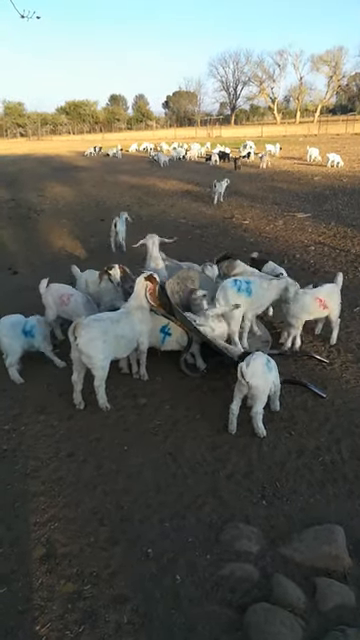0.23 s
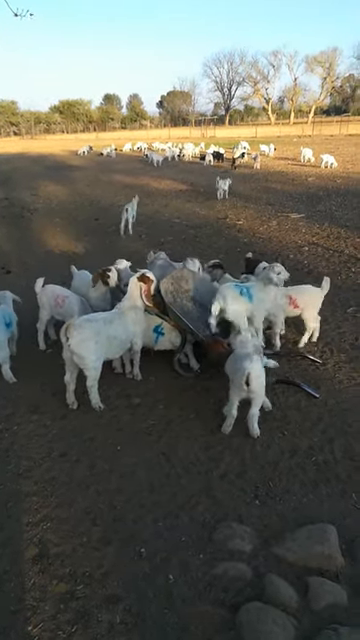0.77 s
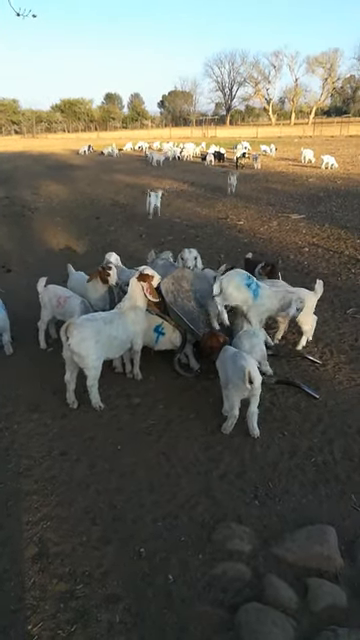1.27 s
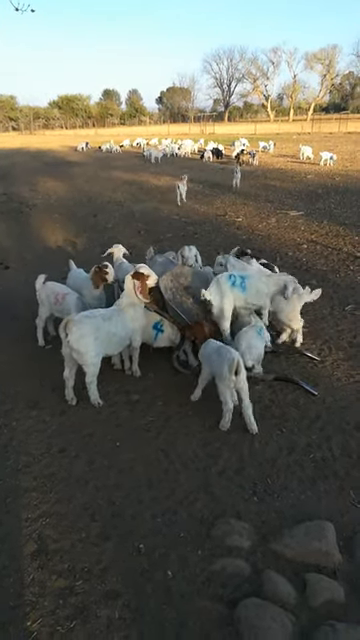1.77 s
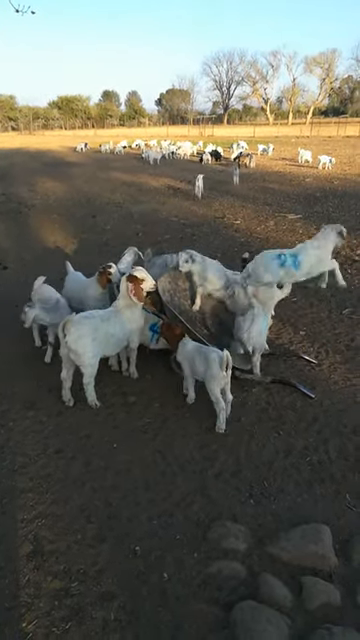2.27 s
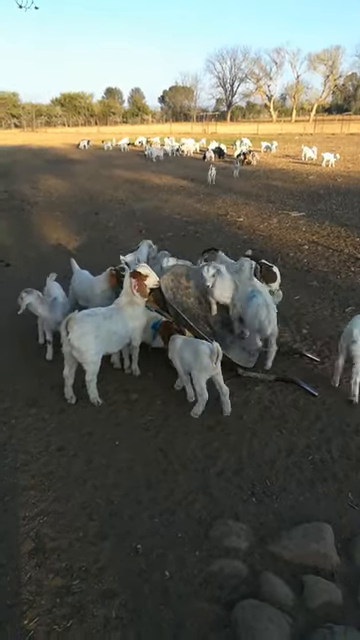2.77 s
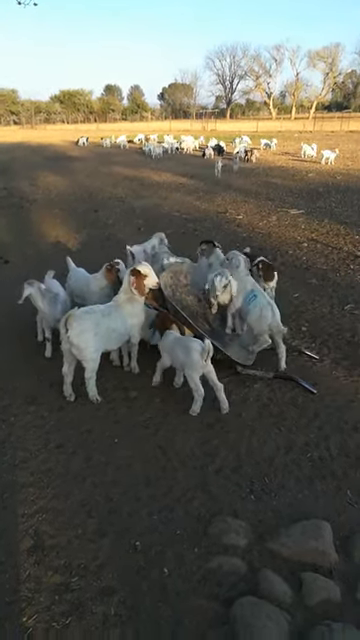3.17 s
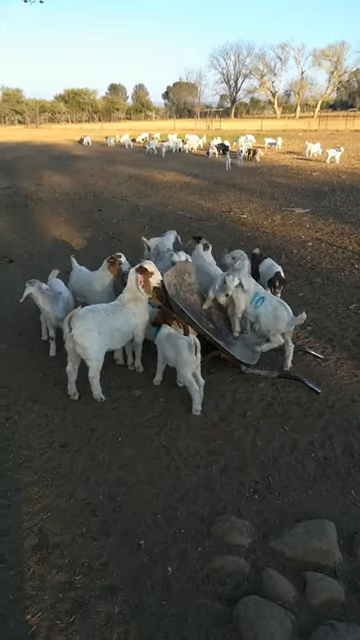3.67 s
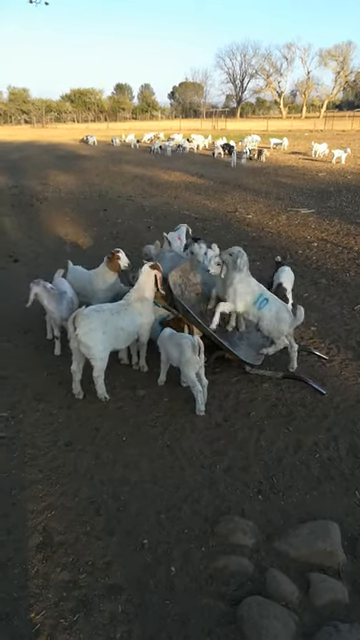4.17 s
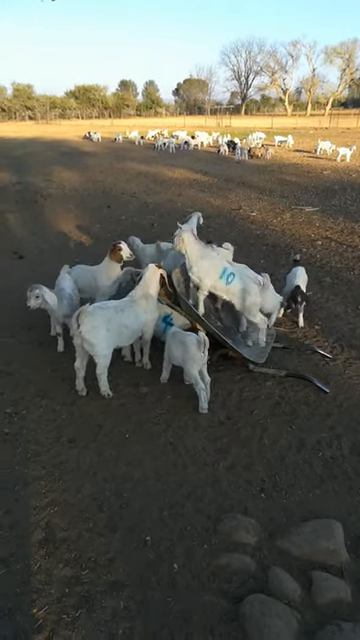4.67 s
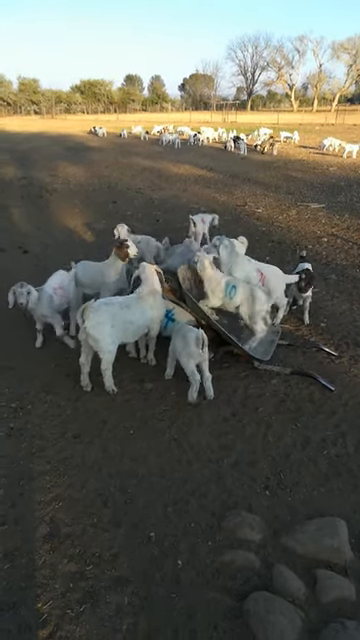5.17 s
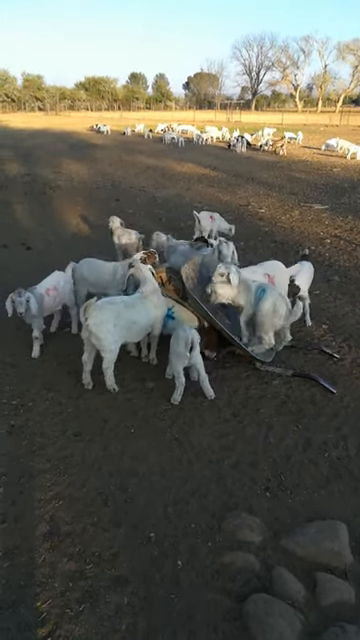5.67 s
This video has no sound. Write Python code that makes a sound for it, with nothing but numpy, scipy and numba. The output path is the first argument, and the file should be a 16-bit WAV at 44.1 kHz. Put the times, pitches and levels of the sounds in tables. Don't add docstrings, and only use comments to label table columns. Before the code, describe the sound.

Close to a hand-held phone outdoors, small goat hooves knock and clang on a steel wheelbarrow tray, with hollow booms and brief metallic ringing. Gritty scrapes fill between blows. A kid bleats faintly early, near four seconds and at the end. Wind thumps are strongest at the start; the hardest clatter comes just before five seconds.

```python
import sys
import numpy as np
from scipy import signal
from scipy.fft import rfft, irfft, next_fast_len
from scipy.io import wavfile
from scipy.ndimage import uniform_filter1d
from numba import njit

SR = 44100
rng = np.random.default_rng(int(sys.argv[2]) if len(sys.argv) > 2 else 0)


def gain_from_db(level_db):
    decades = np.asarray(level_db, float) / 20
    return 10 ** decades


def persist_wave(psi):
    counts = np.round(np.clip(psi, -1, 1) * 32767).astype(np.int16)
    wavfile.write(sys.argv[1], SR, np.atleast_2d(counts).T)


N = 261072

# f/Hz, width/Hz, level/dB
TRAY_MODES = [(739.6, 120, -2), (1280, 31, -1), (1595, 130, 0), (2082, 110, -6), (2280, 24, -6),
              (3660, 95, -4), (3750, 26, -5)]
# f/Hz, level/dB
LEFT_PATH = [(100, -3), (300, 3.5), (490, -12.5), (620, -4.5), (1500, -5), (2000, -10.5), (2300, -6.5),
             (2650, -12.5), (3250, -9.5), (4400, -15.5), (5400, -9), (6600, -11.5), (9500, -33.5),
             (16000, -37.5)]
RIGHT_PATH = [(100, -2.5), (380, 4), (510, -10.5), (680, -7), (1100, -8), (1600, -1.5), (2700, -10),
              (3600, -3), (4400, -13), (5000, -8), (5600, -14), (7100, -20), (8100, -24), (10000, -36.5),
              (16000, -35.5)]
# t/s, peak level/dB, f/Hz
EDDIES = [(0.276, -36, 116), (0.407, -29, 104), (0.643, -21.5, 75), (0.025, -23, 96), (0.809, -23, 75),
          (1.036, -28, 64.6), (1.121, -28, 64.6), (1.258, -47, 51.1), (1.4, -38, 70), (1.424, -49, 94.2),
          (1.531, -40, 88), (1.707, -46, 51.1), (1.707, -31, 53.4), (1.872, -37, 70.0), (2.107, -40, 51.1),
          (2.344, -36, 137), (2.491, -32, 50.6), (2.66, -24, 89.5), (3.178, -33.5, 129), (3.5, -38, 56.5),
          (4.142, -49, 159), (4.146, -37, 75), (4.317, -44, 153), (4.393, -36, 143), (4.52, -36, 55),
          (2.19, -30, 85), (3.95, -45, 60), (4.03, -40, 45), (4.95, -32, 88), (5.04, -36, 85),
          (2.59, -35, 45), (.33, -34, 40), (.085, -26, 140), (4.19, -37, 40), (4.73, -45, 121),
          (4.885, -45, 159), (4.887, -36, 159), (5.15, -36, 151), (5.72, -45, 45), (5.327, -39, 67.3)]


def on_log(table, hz):
    f, v = np.transpose(table)
    return np.interp(np.log(np.maximum(hz, 1)), np.log(f), v)


def unit(x):
    return x / np.sqrt(np.mean(x ** 2))


def band(x, lo_hz, hi_hz, order=3):
    return signal.sosfilt(signal.butter(order, [lo_hz, hi_hz], "band", fs=SR, output="sos"), x)


def stereo_noise():
    return rng.standard_normal((2, N))


def walk(rate_hz):
    hold = int(SR / rate_hz)
    steps = np.repeat(rng.standard_normal(N // hold + 1), hold)
    return 1.45 * uniform_filter1d(uniform_filter1d(steps, hold), hold)[:N]


@njit
def ring(start, length, pole, push, turn, n):
    out = np.zeros((2, n))
    for m in range(len(start)):
        z = push[m]
        for i in range(start[m], min(start[m] + length[m], n)):
            out[0, i] += z.imag
            out[1, i] += (z * turn[m]).imag
            z *= pole[m]
    return out


def strike(s, hz, db, t60):
    s, hz, db, t60 = (np.ravel(a) for a in np.broadcast_arrays(s, hz, db, t60))
    pole = np.exp(2j * np.pi * hz / SR - np.log(1000) / (t60 * SR))
    turn = np.exp(2j * np.pi * rng.random(len(s)))
    start = (s * SR).astype(np.int64)
    length = (t60 * SR / 2).astype(np.int64)
    return ring(start, length, pole, gain_from_db(db) + 0j, turn, N)


def bright_share(hz):
    return np.interp(np.log(hz), np.log([2400, 3200]), [0, 1])


def hooves():
    # t/s, clang peak level/dB, boom level/dB, boom centre f/Hz, bright level/dB
    stomps = [(.474, -64, -36.5, 233, -69), (.726, -17.5, -38, 374, -27.5), (.789, -36.5, -38, 248.5, -45),
              (1.411, -30.5, -34, 245.6, -46.5), (1.477, -31.5, -36.5, 317, -46.5),
              (1.699, -29.5, -30, 204.5, -46.5), (1.904, -38, -37.5, 254, -48),
              (2.048, -26.5, -36, 350, -37), (2.242, -37, -32.5, 240.4, -40),
              (2.334, -35.5, -34.5, 247, -46.5), (2.939, -27, -31, 291, -43.5),
              (3.176, -37, -31.5, 204, -55), (3.473, -40.5, -36, 260.7, -62),
              (3.638, -31.5, -40, 336, -36.5), (4.096, -29, -35.5, 274, -40.5),
              (4.45, -29.5, -34, 240, -55), (4.567, -25, -33.5, 309, -36), (4.685, -31, -35.5, 350, -44.5),
              (4.845, -17.5, -48, 288, -36), (4.892, -20.5, -27.5, 250, -26.5),
              (4.985, -31.5, -29.5, 337, -52), (5.022, -22, -33.5, 346, -34), (5.558, -37, -32.5, 260, -46),
              (5.887, -49, -42, 378, -57)]
    # t/s, clang peak level/dB, bright level/dB, clang t60/s
    knocks = [(.084, -29, -46.5, 0.23), (.17, -27.5, -42.5, .35), (.236, -35, -47, .34),
              (.503, -42, -51.5, 0.34), (.917, -52, -53.5, .18), (.952, -51, -63, 0.22),
              (1.13, -40, -49, .15), (1.174, -22, -35, .18), (1.368, -46, -65, 0.27),
              (1.503, -28.5, -38, 0.21), (1.826, -58, -57, 0.06), (2.088, -26, -41.5, 0.19),
              (2.119, -36.5, -39.5, .26), (2.539, -45, -52, .2), (2.609, -38.5, -48, 0.5),
              (2.693, -35.5, -45, .29), (3.207, -27.5, -39.5, 0.18), (3.397, -47, -52, .11),
              (4.171, -29.5, -47, 0.083), (4.213, -48, -40.5, 0.12), (4.253, -47, -52, .2),
              (4.392, -32.5, -43, 0.24), (4.511, -28.5, -37, .17), (4.814, -37, -49.5, .16),
              (5.11, -28.5, -28, .13), (5.418, -46, -54, .6)]
    stomp_t60_s, knock_boom_db, knock_boom_hz = .22, -22.5, 260
    rows = [(*row, stomp_t60_s) for row in stomps]
    for s, db, bright_db, t60 in knocks:
        rows.append((s, db, db + knock_boom_db, knock_boom_hz, bright_db, t60))
    return np.array(rows)


def clang(count=120):
    s, mid_db, _, _, bright_db, t60 = hooves().T[:, :, None]
    chance = rng.random((len(s), 4, count))
    hz = 500 + 5500 * chance[:, 0] ** 1.5
    clear = len(TRAY_MODES)
    hz[:, :clear] = np.array(TRAY_MODES)[:, 0] * (1 + 0.018 * (chance[:, 0, :clear] - .5))
    bright = bright_share(hz)
    db = (1 - bright) * (mid_db - 17) + bright * (bright_db - 9.5)
    db = db + 10 * np.log10(-np.log(chance[:, 1]))
    spread_s = -.005 * np.log(chance[:, 2])
    ring_s = np.clip(t60 * (hz / 1500) ** -.3 * (.5 + .5 * chance[:, 3]), .01, .6)
    return strike(s + spread_s, hz, db, ring_s)


def pings(pair=0.013, under_db=-8.5):
    # t/s, peak level/dB, f/Hz, t60/s
    panel_tones = [(0.083, -32, 799, 0.18), (0.169, -33, 853, 0.2), (0.235, -33.5, 1070, 0.18),
                   (0.724, -25, 730, 0.2), (1.174, -26, 581, 0.2), (1.412, -35.5, 698, 0.17),
                   (1.475, -41, 834, 0.2), (1.698, -42, 1110, 0.2), (2.047, -32, 732, 0.2),
                   (2.09, -32, 746, 0.2), (2.333, -41, 1100, 0.2), (2.938, -37, 703, 0.15),
                   (3.208, -39, 1140, 0.23), (3.473, -43, 748, 0.19), (3.636, -41, 740, 0.1),
                   (4.095, -37, 969, 0.2), (4.171, -36.5, 846, 0.2), (4.45, -31, 1128, 0.2),
                   (4.567, -32, 1080, 0.2), (4.685, -36, 884, 0.2), (4.844, -25, 695, 0.2),
                   (4.891, -26.5, 813, 0.2), (4.986, -32.5, 847, 0.2), (5.022, -27, 699, 0.2),
                   (5.113, -40, 834, 0.2), (5.479, -44, 896, 0.2), (5.557, -43, 886, 0.2),
                   (0.0, -31, 1340, 0.12), (0.0842, -34, 1445, 0.11), (0.17, -30, 1597, 0.12),
                 (0.5024, -44, 1860, 0.12), (0.6044, -37, 1420, 0.12), (0.726, -20.5, 1590, 0.12),
                 (0.7882, -34, 1580, 0.12), (1.1308, -44, 1820, 0.06), (1.1752, -26, 1605, 0.12),
                 (1.4108, -36, 1590, 0.12), (1.477, -34, 1254, 0.11), (1.5035, -32, 1470, 0.12),
                 (1.6986, -32, 1590, 0.12), (1.9034, -41, 1260, 0.12), (1.953, -36, 1485, 0.12),
                 (2.048, -27, 1293, 0.12), (2.088, -25, 1277, 0.12), (2.1396, -32, 1270, 0.13),
                 (2.2418, -35, 1280, 0.12), (2.333, -34, 1570, 0.12), (2.9393, -33, 1312, 0.12),
                 (3.2071, -35, 1500, 0.12), (3.6385, -29.5, 1340, 0.11), (3.693, -37, 1293, 0.14),
                 (4.0956, -32.5, 1470, 0.12), (4.1712, -29, 1600, 0.12), (4.3191, -39, 1550, 0.12),
                 (4.3919, -34, 1434, 0.12), (4.5111, -33, 1268, 0.12), (4.568, -28.5, 1500, 0.14),
                 (4.6967, -31, 1510, 0.12), (4.8454, -20, 1500, 0.12), (4.8914, -28, 1640, 0.12),
                 (5.0214, -26, 2080, 0.12), (5.1105, -26, 1770, 0.12), (5.461, -37, 1290, 0.12),
                   (0.7277, -29, 1750, 0.14), (1.1752, -30, 2250, 0.14), (1.5034, -34, 1860, 0.14),
                   (1.9555, -46, 1860, 0.14), (2.0467, -35, 2220, 0.14), (3.2066, -32, 1820, 0.14),
                   (3.6386, -32, 1840, 0.14), (4.0964, -36, 2110, 0.14), (4.3914, -38, 2250, 0.14),
                   (4.5106, -35, 2140, 0.14), (4.568, -33, 1940, 0.14), (4.8444, -25, 1790, 0.17),
                   (4.8914, -28, 2150, 0.14),
                   (0.7238, -23.5, 4050, 0.08), (0.7884, -32.5, 3580, 0.073), (0.9168, -48, 3260, 0.09),
                  (1.1308, -44, 3600, 0.08), (1.1742, -28, 3700, 0.07), (1.504, -30.5, 3060, 0.076),
                  (1.698, -41, 3130, 0.087), (2.0472, -33, 3150, 0.08), (2.1201, -32.5, 3340, 0.08),
                  (2.9387, -37, 3770, 0.08), (3.2066, -30.5, 3690, 0.08), (3.3964, -50, 3600, 0.08),
                  (3.6361, -27, 3610, 0.08), (4.0971, -35, 3220, 0.092), (4.1704, -38, 3690, 0.08),
                  (4.2153, -36, 3620, 0.09), (4.2787, -38, 3680, 0.08), (4.5106, -29, 3570, 0.087),
                  (4.568, -29, 3150, 0.08), (4.8439, -29, 3430, 0.08), (4.8914, -22.5, 3730, 0.088),
                  (5.0195, -27.5, 3690, 0.099), (5.1103, -24, 3850, 0.08)]
    # f/Hz, level against the clang/dB, t60/s
    frame_modes = [(580, -19.5, 0.68), (660, -29, .45)]
    s, db, hz, t60 = np.array(panel_tones).T[:, :, None]
    db = db + under_db - (on_log(LEFT_PATH, hz) + on_log(RIGHT_PATH, hz)) / 2
    panel = strike(s + 0.000996, hz * [1, 1 + pair], db + [0, -6.0], np.clip(t60, .02, .8))
    frame_hz, frame_db, frame_t60 = np.transpose(frame_modes)
    blows = hooves()
    return panel + strike(blows[:, :1], frame_hz, blows[:, 1:2] + frame_db, frame_t60)


def rattle(crack_s=0.0027, crack_db=-4.5, rough_db=2.0):
    out, t = 0, np.arange(SR // 3) / SR
    jolts = gain_from_db(rough_db * walk(300))
    layers = [(450, 1150, -11, 1.3), (1150, 2700, -4, 1.7), (2600, 4350, 3.5, 1.08),
              (4530, 10700, 8.5, 0.69), (8800, 16400, 9, 0.5)]
    for lo_hz, hi_hz, db, share in layers:
        power = np.zeros(N + len(t))
        for s, _, _, _, bright_db, t60 in hooves():
            shape = np.exp(-np.log(1000) * t / (share * t60)) + gain_from_db(crack_db) * np.exp(-t / crack_s)
            start = int(s * SR)
            power[start:start + len(t)] += (gain_from_db(db + bright_db) * shape) ** 2
        out = out + np.sqrt(power[:N]) * jolts * unit(band(stereo_noise(), lo_hz, hi_hz, order=2))
    return out


def boom(reach_hz=75, t60=0.3, build_s=0.00801, shudder_db=-13.0, shudder_s=.017):
    # t/s, peak level/dB, boom centre f/Hz
    thuds = [(0.029, -32, 242), (0.114, -31, 196), (0.174, -34, 231), (0.206, -33.5, 258),
             (0.253, -35.5, 250), (0.336, -42, 315), (0.529, -35, 288), (0.6, -34, 242),
             (1.172, -27.5, 250), (1.259, -47, 269), (1.365, -46, 299), (1.549, -46, 334),
             (1.807, -39.5, 192), (1.998, -38, 244), (2.137, -34.5, 202), (2.277, -33, 243.5),
             (2.526, -43.5, 283), (2.633, -39.5, 304), (2.837, -46, 288), (2.885, -42, 293),
             (3.292, -42, 248), (3.699, -40.5, 288), (4.136, -38, 253), (4.272, -40.5, 209),
             (4.309, -39.5, 209), (4.406, -34.5, 330), (4.811, -35, 286), (5.114, -31.5, 238),
             (5.155, -36, 194), (5.269, -47, 294), (5.459, -52, 283), (5.609, -41, 344)]
    hollow_hz = [171.8, 200.7, 222.7, 242.7, 266, 288, 307.6, 328, 350, 371, 399, 440]
    rows = np.vstack([hooves()[:, [0, 2, 3]], np.array(thuds) + [0, -4.0, 0]])
    s, low_db, centre_hz = rows.T[:, :, None]
    chance = rng.random((len(s), 3, len(hollow_hz)))
    hz = hollow_hz * (1 + 0.022 * (chance[:, 0] - .5))
    db = low_db - 8.0 - 9 * np.abs(hz - centre_hz) / reach_hz + 9 * (chance[:, 1] - .5)
    hz = np.hstack([hz, centre_hz])
    db = np.hstack([db, low_db - 7.0])
    late_s = np.hstack([-build_s * np.log(chance[:, 2]), 0 * s])
    hollow = band(strike(s + .0005 + late_s, hz, db, t60 * (hz / 250) ** -.5), 106, 1100, order=2)
    kicks = np.bincount((s[:, 0] * SR).astype(int), gain_from_db(2 * low_db[:, 0] + 2 * shudder_db), N)
    fade = np.exp(-1 / (shudder_s * SR))
    swell = signal.lfilter([np.e * (1 - fade)], [1, -2 * fade, fade ** 2], kicks)
    return hollow + np.sqrt(np.abs(swell)) * unit(band(stereo_noise(), 159, 461, order=2))


def sliding():
    # start t/s, length/s, level/dB, brightness/dB, weight/dB
    slides = [(0, 0.1, -39, -6, 7.5), (.195, 0.075, -42, -6, -2), (.54, 0.095, -43.5, -11, 3.5),
              (0.752, 0.047, -40.5, -8, -5), (.33, .13, -55.5, -3, 8.5), (1.486, .03, -48, -8, 1),
              (1.26, .1, -58, -7.5, 9), (1.568, .07, -54.5, -1, 4), (1.966, 0.053, -41, -6.5, -5),
              (1.716, 0.075, -54, -8, 8), (2.082, .21, -42.5, -10.5, -4), (2.36, 0.13, -46, -5.5, 1),
              (2.532, 0.21, -44.5, -3, -4.5), (2.788, 0.096, -41, -4.5, -7), (3.197, .1, -50.5, -9, 3),
              (3.343, 0.066, -61, -12, 9), (3.517, 0.11, -52.5, -4.5, 4), (3.666, 0.083, -45, -8.5, -3),
              (3.82, .11, -53.5, -1.5, -3.5), (4.267, 0.067, -44.5, -2, 2.5),
              (4.428, 0.19, -47.5, -3.5, -3), (4.687, .1, -46.5, -8, 3.5), (4.876, .31, -44, -5.5, 4.5),
              (5.26, 0.17, -55.5, -4.5, -0.5), (5.46, .15, -44, -7, -5), (5.695, 0.11, -60, -2.5, -3)]
    grip_db_per_s, lift_db_per_s, airy_under_bright_db = 300, 150, -17.5
    idle_db = np.array([[-68.5], [-74.5], [-72], [-78.5]])
    t = np.arange(0, N + 64, 64) / SR
    power = gain_from_db(idle_db) ** 2 + 0 * t
    for s, length_s, db, bright_db, weight_db in slides:
        grip_db = grip_db_per_s * np.maximum(s - t, 0)
        lift_db = lift_db_per_s * np.maximum(t - s - length_s, 0)
        tilt_db = np.array([[0], [bright_db], [weight_db], [bright_db + airy_under_bright_db]])
        power = power + gain_from_db(db - grip_db - lift_db + tilt_db) ** 2
    return [np.interp(np.arange(N) / SR, t, zone_db) for zone_db in 10 * np.log10(power)]


def scrape(grit_rate=900, grit_db=1.5, hiss=1.0):
    mid_db, bright_db, low_db, airy_db = sliding()
    slips = (rng.random(N) < grit_rate / SR) * gain_from_db(grit_db * rng.exponential(size=N))
    push = hiss + unit(signal.lfilter([1], [1, -.985], slips))
    noise = push * gain_from_db(1.7 * walk(24.91)) * stereo_noise()
    body_db = .3 * low_db + .7 * mid_db
    low = unit(band(noise, 150, 600, order=2)) * gain_from_db(low_db - 7.0 + 3.45 * walk(18))
    body = unit(band(noise, 515, 1220, order=2)) * gain_from_db(body_db - 5.5 + 3.7 * walk(14))
    nasal = unit(band(noise, 1220, 1700, order=2)) * gain_from_db(mid_db - 5.5 + 2.4 * walk(9))
    mid = unit(band(noise, 1150, 2910, order=2)) * gain_from_db(mid_db - 1.0 + 2.55 * walk(22))
    edge = unit(band(noise, 2405, 4440)) * gain_from_db(bright_db + 6.5 + 3.3 * walk(13))
    bright = unit(band(noise, 4380, 8500)) * gain_from_db(bright_db + 11.0 + 2.04 * walk(22))
    airy = unit(band(noise, 9200, 15500)) * gain_from_db(airy_db + 35.5 + 2.4 * walk(9))
    return low + body + nasal + mid + edge + bright + airy


def skitter(count=12000, t60=0.037, spread_db=3.5):
    mid_db, bright_db, _, _ = sliding()
    chance = rng.random((count, 5)).T
    s = chance[0] * (N - 1) / SR
    clear_hz = np.array(TRAY_MODES)[(chance[2] * len(TRAY_MODES)).astype(int), 0]
    hz = np.where(chance[1] < .3, clear_hz, 620 + 6400 * chance[2] ** 1.4)
    bright = bright_share(hz)
    at = (s * SR).astype(int)
    db = (1 - bright) * (mid_db[at] - 5.5) + bright * (bright_db[at] + 2)
    db = db - spread_db * np.log(.06 + chance[3])
    return strike(s, hz, db, t60 * (.5 + chance[4]) * (hz / 1500) ** -.4)


def bleats(arch=.12, half_s=.04, rough=0.059):
    # t/s, top pitch f/Hz, level/dB, share of the lower throat band/dB
    throbs = [(.265, 532, -41, -1), (.345, 529, -41, 1.5), (.425, 513, -48, -3), (.51, 470, -50, -2),
              (3.755, 503, -38.5, -12), (3.835, 526, -38, 0), (3.917, 514, -41, -15),
              (4.003, 486, -41, -13), (4.087, 475, -43.5, -8), (4.175, 461, -44, -13),
              (5.667, 510, -46, -2), (5.75, 515, -41, -4), (5.83, 500, -46, -10)]
    out, t = np.zeros(N), np.arange(-2400, 2400) / SR
    overtone = np.arange(2, 17)[:, None]
    for s, top_hz, db, lower_db in throbs:
        hz = top_hz * (1 - arch * np.sin(np.pi / 2 * np.clip(t / half_s, -1, 1)) ** 2)
        upper_throat = np.exp(-((overtone * hz - 6000) / 1200) ** 2)
        lower_throat = gain_from_db(lower_db - 7) * np.exp(-((overtone * hz - 4000) / 1200) ** 2)
        wobble = uniform_filter1d(rng.standard_normal((2, len(t))), size=150) * np.sqrt(150)
        phase = overtone * (2 * np.pi * np.cumsum(hz) / SR + rough * wobble[0])
        voice = np.sum((upper_throat + lower_throat) * np.sin(phase), axis=0)
        level = gain_from_db(db - 2.0 + 2.7 * wobble[1]) * np.exp(-(t / 0.037) ** 2)
        out[int(s * SR) - 2400:int(s * SR) + 2400] += level * voice
    return out * np.array([[1], [.5]])


def yard(db=-56.5):
    return gain_from_db(db) * unit(band(stereo_noise(), 1200, 17000, order=1))


def ports(pair):
    # f/Hz, lead/rad
    phase_lead = [(150, 0), (400, .9), (560, -2.3), (700, -5.6), (1000, -6.7), (1200, -6.1), (2400, -7),
                  (2560, -4.2), (3900, -7.7), (5100, -6.7), (5600, -8), (6500, -8.1), (7100, -5.8),
                  (9000, -7.6)]
    # f/Hz, share 0-1
    likeness = [(100, 0.96), (400, 0.86), (560, 0.71), (800, 0.54), (1350, 1), (2200, 0.76), (2500, 0.1),
                (3200, 0.8), (4100, 0.43), (4400, 0), (5600, 0.63), (7000, 0.15), (9500, 0.47),
                (16000, 0.4)]
    size = next_fast_len(N + SR)
    hz = np.arange(size // 2 + 1) * SR / size
    cepstrum = irfft(np.log(gain_from_db(on_log(LEFT_PATH, hz))), size)
    cepstrum[1:size // 2] *= 2
    cepstrum[size // 2 + 1:] = 0
    left = np.exp(rfft(cepstrum))
    tilt = gain_from_db(on_log(RIGHT_PATH, hz) - on_log(LEFT_PATH, hz))
    right = left * tilt * np.exp(1j * on_log(phase_lead, hz))
    a, b = rfft(pair, size)
    alike = np.clip(on_log(likeness, hz), 0, 1)
    return irfft([left * a, right * (alike * a + np.sqrt(1 - alike ** 2) * b)], size)[:, :N]


def gusts(swell_db=-21, swell_s=0.037):
    # t/s, level/dB
    breeze_level = [(0.0, -34), (0.56, -47), (0.64, -37), (1.3, -55), (1.76, -43.5), (2.04, -54), (2.13, -42),
                    (2.47, -60), (2.51, -44), (2.85, -43.5), (2.92, -64), (3.15, -56), (3.86, -62.5), (4.19, -47),
                    (4.27, -68), (4.45, -48.5), (5.6, -64), (5.92, -67)]
    t = np.arange(N) / SR
    power = gain_from_db(np.interp(t, *np.transpose(breeze_level)) - 0.5) ** 2
    for s, db, _ in EDDIES:
        power = power + gain_from_db(db + swell_db) ** 2 * np.exp(-((t - s - swell_s / 2) / swell_s) ** 2)
    return 10 * np.log10(power)


def breeze(apart=0.25, cycles=.55, peak_turns=1.33):
    # f/Hz, level/dB
    rumble_colour = [(15, -13), (30, -4), (45, -1), (70, -1.5), (120, -3), (170, -11), (300, -22),
                     (600, -42), (3000, -90)]
    hz = np.arange(N // 2 + 1) * SR / N
    mid, side = irfft(rfft(stereo_noise()) * gain_from_db(on_log(rumble_colour, hz)), N)
    wide = unit(mid) + apart * unit(side) * np.array([[1], [-1]])
    rumble = gain_from_db(gusts() - 1.0 + 3.7 * walk(14)) * wide
    for s, db, eddy_hz in EDDIES:
        span = slice(int(s * SR), int((s + .1) * SR))
        turns = np.arange(N)[span] / SR * eddy_hz - s * eddy_hz
        swing = np.sin(2 * np.pi * turns) * np.exp(-((turns - peak_turns) / cycles) ** 2)
        rumble[:, span] += gain_from_db(db - 5.5) * swing
    return rumble


def scene():
    blows = band(clang() + skitter() + pings(), 464, 18000, order=2)
    return ports(blows + rattle() + boom() + scrape() + bleats() + yard()) + breeze()


def band_limit(x):
    return signal.sosfilt(signal.butter(12, 15870, fs=SR, output="sos"), x)


def record(dry):
    rounded = np.tanh(3.0 * dry) / 3
    top_cut = signal.ellip(8, .2, 70, 15850, fs=SR, output="sos")
    return band_limit(signal.sosfilt(top_cut, rounded))


dry = scene()
out = record(dry)
persist_wave(out)
```